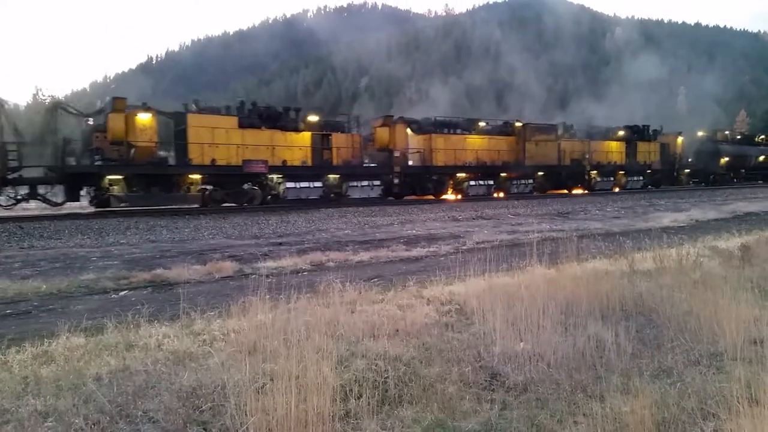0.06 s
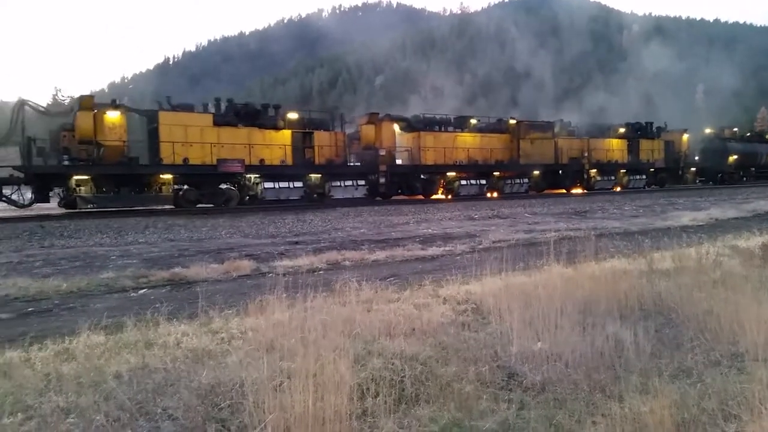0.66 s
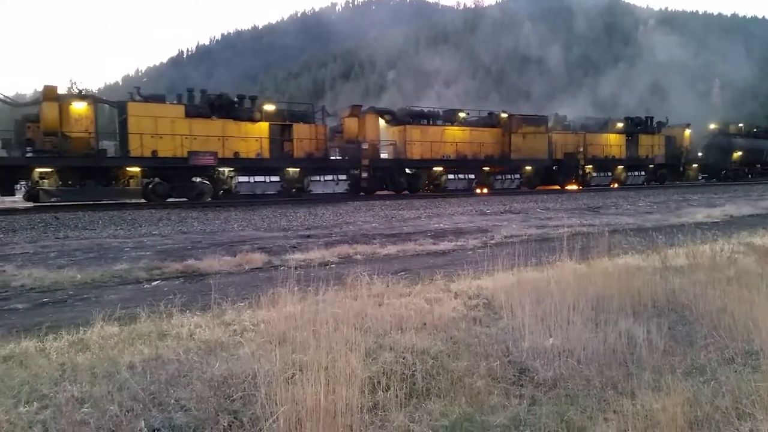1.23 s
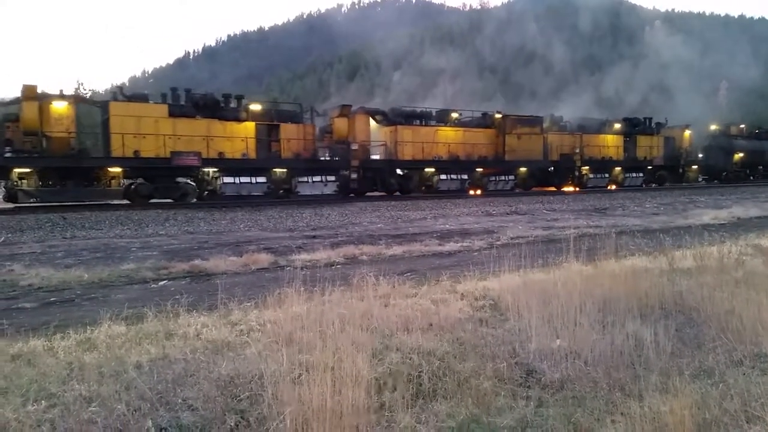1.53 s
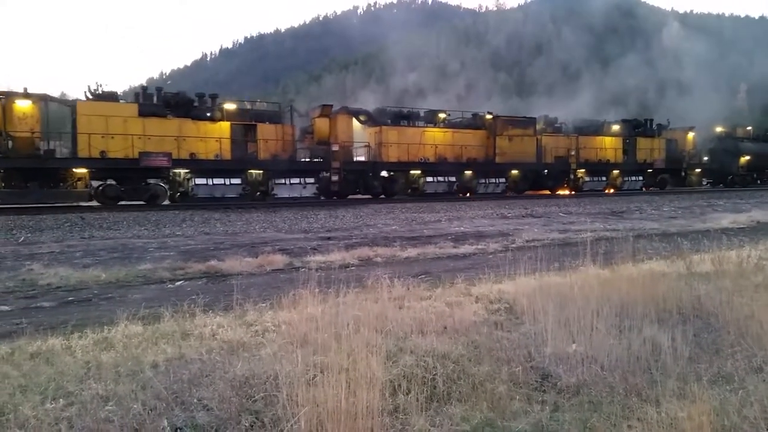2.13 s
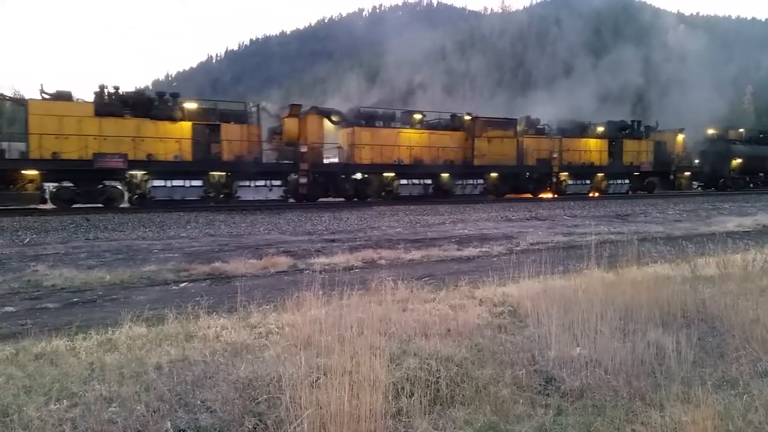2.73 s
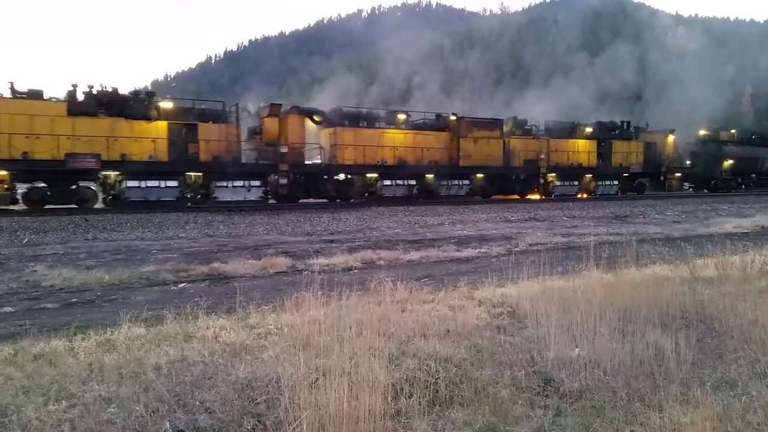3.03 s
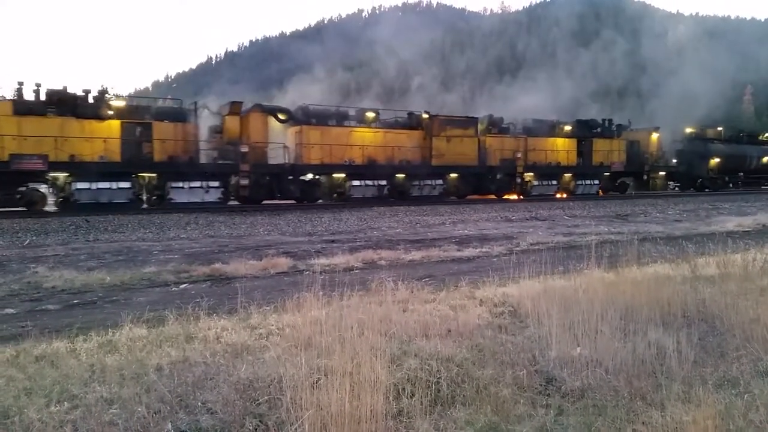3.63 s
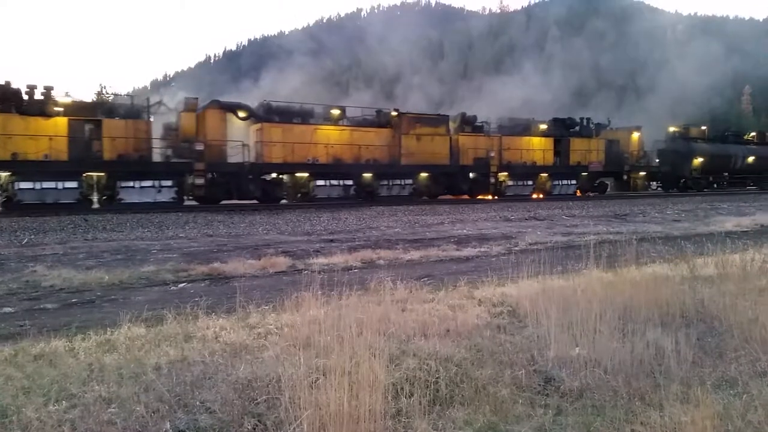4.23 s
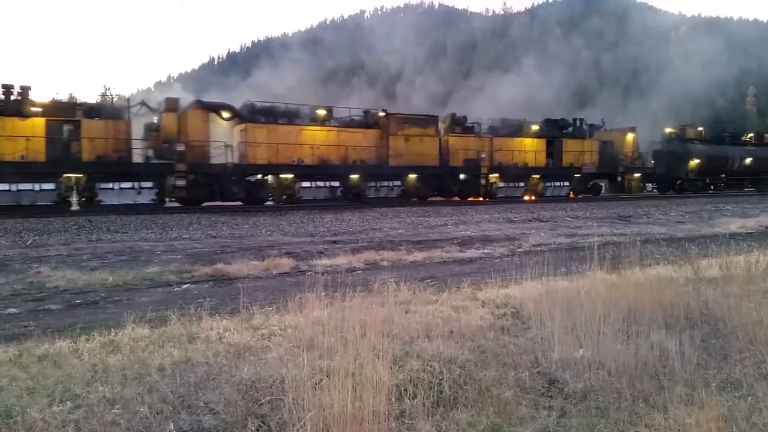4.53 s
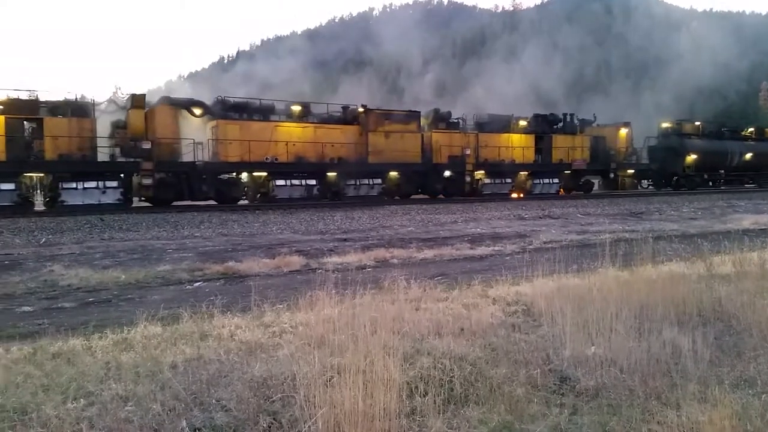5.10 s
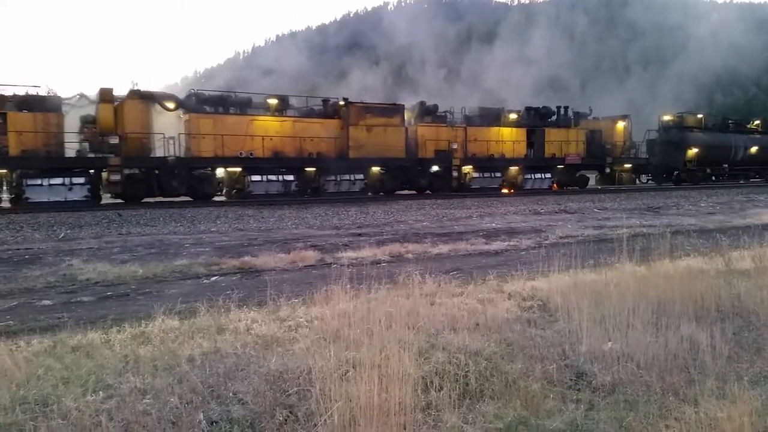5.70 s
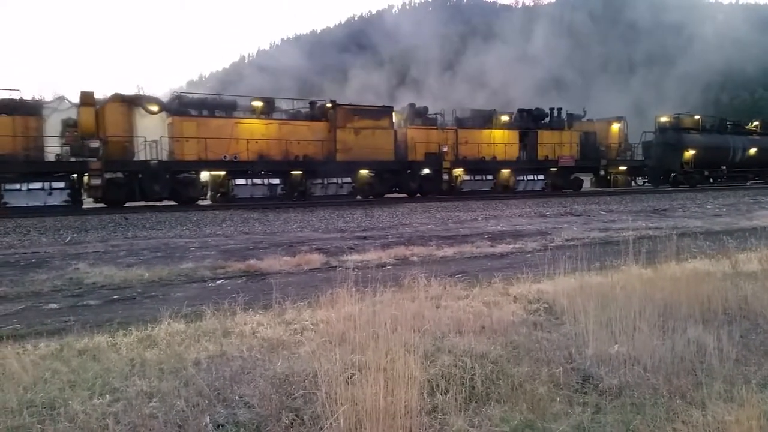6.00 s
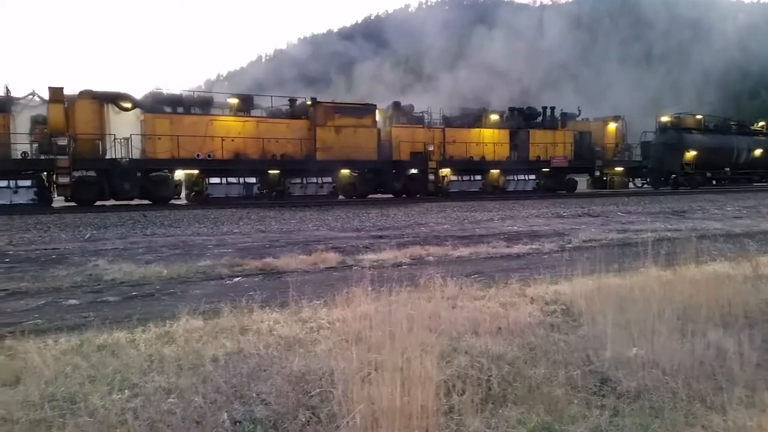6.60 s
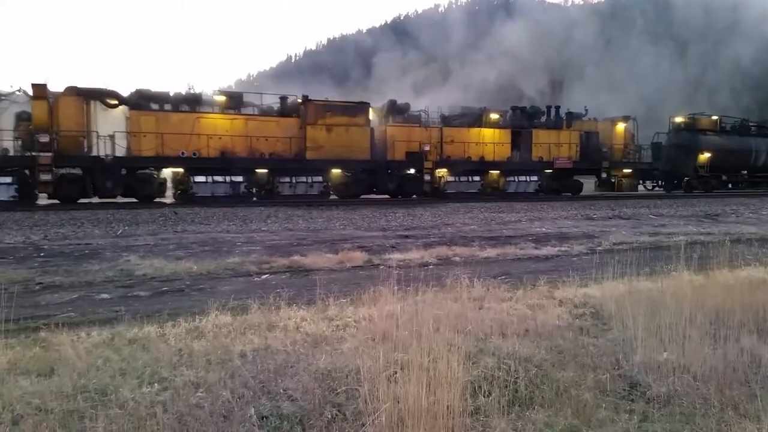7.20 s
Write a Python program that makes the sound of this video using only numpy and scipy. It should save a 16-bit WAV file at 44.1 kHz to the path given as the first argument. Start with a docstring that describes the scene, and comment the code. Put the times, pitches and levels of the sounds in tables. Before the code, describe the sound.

Low diesel rumble and machine hum run steadily under the pulsing hiss and thin squeals of a slow train grinding the rails.

```python
"""A rail grinding train creeps past across open ground.
From the start, diesel generators near 30 turns a second beat against each other over machine hum,
exhaust rumble and fan roar; spinning stones hiss and throb on the rail, turbochargers whine far above.
From 0.3 s rail and stones squeal faintly, and now and then a stone bites harder.
Two beating fans swell near 1.9 s and again from 3.3 s; the squeals crowd together around 6 s."""
import sys
import numpy as np
from scipy import signal
from scipy.fft import rfft, irfft
from scipy.io import wavfile
from scipy.ndimage import uniform_filter1d, minimum_filter1d

SR = 44100
rng = np.random.default_rng(int(sys.argv[2]) if len(sys.argv) > 2 else 0)


def master_out(mix):
    """Clip the mix to full scale and print it as 16-bit PCM to the path in sys.argv[1]."""
    frames = np.transpose(np.atleast_2d(mix))
    ceiling = np.clip(frames, -1, 1)
    pcm = np.round(ceiling * 32767).astype(np.int16)
    wavfile.write(sys.argv[1], SR, pcm)


N = 324135
TIME_S = np.arange(N) / SR
BINS_HZ = np.fft.rfftfreq(N, 1 / SR)


def gain_of(db):
    """Decibels to gain."""
    return 10 ** (np.asarray(db) / 20)


def unit_rms(x):
    """Scales to rms 1."""
    return x / np.sqrt(np.mean(abs(x) ** 2) + 1e-20)


def at_hz(table, hz):
    """Spectrum table interpolated over log frequency."""
    f_hz, value = np.transpose(table)
    return np.interp(np.log(hz + 1), np.log(f_hz + 1), value)


def follow(table):
    """Time table interpolated at every sample."""
    return np.interp(TIME_S, *np.transpose(table))


def drift(rate_hz, size=N):
    """Slow random curve, rms 1, Gaussian roll-off at rate_hz."""
    t_s = np.linspace(0, size / SR, num=8192)
    f_hz = np.fft.rfftfreq(len(t_s), t_s[1])
    lowpass = np.exp(-np.minimum((f_hz / rate_hz) ** 2 / 2, 20)) * (f_hz > 0)
    slow = irfft(rfft(rng.standard_normal(len(t_s))) * lowpass)
    return np.interp(TIME_S[:size], t_s, unit_rms(slow))


def band_envelope(width_hz, size=N):
    """Complex envelope, rms 1, that spreads a tone over a band."""
    return unit_rms(drift(width_hz / 2, size) + 1j * drift(width_hz / 2, size))


def add(mix, start_s, sound):
    """Mixes a sound in at start_s."""
    part = mix[:, max(round(start_s * SR), 0):][:, :sound.shape[1]]
    part += sound[:, :part.shape[1]]


# right microphone port, shaded from the train, re left: f/Hz, level/dB
SHADE_DB = [(90, .5), (180, 1), (330, 2.2), (500, -1.6), (800, -1.7), (1300, -4.8), (2000, -11), (3200, -8),
            (4300, -19.8), (6000, -28), (8000, -21.8), (10000, -15), (11800, 0), (13000, -2), (15000, .5)]
# phase lead of the left port: f/Hz, phase/rad
LEAD_RAD = [(60, 0.012), (170, 0.092), (400, 1.06), (750, 1.65), (1100, 3.2), (1500, 4.97), (1850, 6.1),
            (2800, 7.25), (4000, 11)]
def right_port(hz):
    """Complex gain of the shaded, lagging right port."""
    return gain_of(at_hz(SHADE_DB, hz)) * np.exp(-1j * at_hz(LEAD_RAD, hz))


# likeness of the two ports: f/Hz, coherence/0-1
COHERENCE = [(100, 0.91), (280, 0.95), (450, 0.78), (750, 0.85), (1000, 0.64), (1250, 0.29), (1700, 0.29),
             (2600, 0.21), (4000, .12), (9000, .05)]
def noise(spectrum_db):
    """Shaped, partly coherent stereo noise, rms 1 on the left."""
    left, unrelated = rfft(rng.standard_normal((2, N))) * gain_of(at_hz(spectrum_db, BINS_HZ))
    coherence = np.clip(at_hz(COHERENCE, BINS_HZ), 0, 1)
    right = (coherence * left + np.sqrt(1 - coherence ** 2) * unrelated) * right_port(BINS_HZ)
    pair = irfft(np.array([left, right]), N)
    return pair / pair[0].std()


def tone(hz, envelope):
    """Stereo tone with a complex envelope and random phase."""
    wave = envelope * np.exp(2j * np.pi * (hz * TIME_S[:len(envelope)] + rng.random()))
    return np.array([wave.real, (wave * right_port(hz)).real])


# exhaust orders 2-4, each from its leading diesel: f/Hz, start level/dB, fall/(dB/s)
EXHAUST_ORDERS = [(59.7, -24.5, .1), (89.9, -13.4, .55), (121.05, -17.2, .15)]
# the other engines: order f/Hz, offset/Hz, level re order/dB, crest t/s
ENGINE_BEATS = [(59.7, .61, .4, 4.22), (59.7, .2, -3, 2.36), (89.9, -.29, -3.5, 4.45),
                (89.9, .93, -4.2, 3.28), (89.9, -.48, -11, 4.29), (121.05, -1.22, -6.4, 3.45),
                (121.05, -1.43, -8, 3.39), (121.05, -2.1, -7, 3.79), (121.05, -6.54, -7.5, 3.546),
                (121.05, 4.31, -11.5, 3.685)]
def diesels(trim_db=0.28, wander_rad=0.28):
    """Exhaust orders swell as the engines fall into step, fade as they slide apart, and slowly recede."""
    out = np.zeros((2, N))
    for hz, db, fall_db_per_s in EXHAUST_ORDERS:
        others = sum(gain_of(beat_db) * np.exp(2j * np.pi * offset_hz * (TIME_S - crest_s))
                     for order_hz, offset_hz, beat_db, crest_s in ENGINE_BEATS if order_hz == hz)
        level = gain_of(trim_db + db - fall_db_per_s * TIME_S)
        wander = np.exp(1j * wander_rad * drift(0.45))
        out += tone(hz, level * (1 + others) * wander)
    return out


# engine, pump and blower tones: f/Hz, level/dB, unsteadiness/0-1, nearest t/s
MACHINE_TONES = [(179.4, -26.5, .45, 3.1), (180.4, -30, .45, 6.6), (240.5, -32, .5, 3.5),
                 (269.6, -26.5, .4, 2.3), (299.8, -27.5, .45, 1.5), (451.6, -40, .8, 3.5),
                 (473.8, -33, .3, 7.3), (481, -36, .5, .9), (539.4, -35.5, .35, 4.6), (720, -38, .7, 1)]
def hums(passing_s=2.2, waver_hz=1.8):
    """Each machine swells as it nears and falls away with distance; close pairs beat."""
    out = np.zeros((2, N))
    for hz, db, unsteady, nearest_s in MACHINE_TONES:
        distance = np.hypot(1, (TIME_S - nearest_s) / passing_s)
        waver = unit_rms(1 - unsteady + unsteady * band_envelope(waver_hz))
        out += tone(hz, gain_of(db) / distance * waver)
    return out


# blade tones: f/Hz, relative level/dB
FAN_TONES = [(356.2, -1), (358.9, 1.5)]
# fans drawing near: t/s, level/dB
FAN_LEVEL_DB = [(0, -41), (1.4, -37), (1.9, -31), (2.7, -37.5), (3.3, -29.5), (5.2, -30.5), (5.75, -32.5),
                (6.1, -31.5), (7.35, -32)]
def fans(wander_rad=0.5):
    """Two cooling fans at nearly the same speed beat."""
    return sum(tone(hz, gain_of(follow(FAN_LEVEL_DB) + db) * np.exp(1j * wander_rad * drift(0.97)))
               for hz, db in FAN_TONES)


# exhaust noise: f/Hz, relative level/dB
RUMBLE_SPECTRUM_DB = [(12, -31), (25, -20), (45, -12.5), (70, -5.3), (105, -.5), (145, -3), (205, -11),
                      (280, -10.2), (335, -13.5), (420, -22), (800, -45), (2000, -100)]
def rumble(level_db=-18.0, heave_db=0.1, heave_hz=2.1):
    """Exhaust rumble, barely heaving."""
    return noise(RUMBLE_SPECTRUM_DB) * gain_of(level_db + heave_db * drift(heave_hz))


# blower and grinding head noise: f/Hz, relative level/dB
ROAR_SPECTRUM_DB = [(50, -60), (220, -46), (400, -5.5), (520, -1.5), (700, -1), (800, -3), (950, -5),
                    (1300, -5.5), (1550, -10.5), (1800, -8.5), (2100, -13.5), (2500, -15.5), (3200, -22),
                    (7000, -43)]
# cars going by: t/s, level/dB
ROAR_LEVEL_DB = [(0, -25.0), (0.45, -23), (1.3, -24), (1.7, -23), (2.0, -24.8), (2.55, -23), (3.8, -24),
                 (4.35, -25), (4.85, -22.5), (5.25, -24), (5.75, -22.5), (6.7, -24.5), (7.35, -22.5)]
def roar(load_db, trim_db=1.6, load_share=0.53):
    """Blowers and grinding heads roar, partly following the stone load."""
    return noise(ROAR_SPECTRUM_DB) * gain_of(follow(ROAR_LEVEL_DB) + trim_db + load_share * load_db)


# three presses per cycle: t/s in cycle, sigma/s, rise/dB
THROB_PULSES = [(.037, .016, 1.6), (.07, .015, 1.0), (.157, .02, 1.0)]
def throb_db(cycle_s=0.1871):
    """Periodic pressure of the stones on the rail, zero mean."""
    load_db = np.zeros(N)
    for at_s, sigma_s, db in THROB_PULSES:
        offset_s = (TIME_S - at_s + cycle_s / 2) % cycle_s - cycle_s / 2
        load_db += db * np.exp(-(offset_s / sigma_s) ** 2 / 2)
    return load_db - load_db.mean()


# stones on the rail: f/Hz, relative level/dB
HISS_SPECTRUM_DB = [(800, -60), (2500, -7.5), (3600, -6), (4200, 2.5), (5200, 1.8), (6300, -1), (7200, -6),
                    (7900, -8.5), (9000, -6.5), (10200, -8.5), (11200, -15), (13300, -20), (14800, -24),
                    (16000, -31)]
# grinding heads going by: t/s, level/dB
HISS_LEVEL_DB = [(0, -36.5), (0.55, -33.5), (2.1, -36), (2.4, -34.4), (2.8, -35.5), (3.7, -35),
                 (4.25, -36.5), (4.85, -35), (5.3, -36), (5.85, -35.5), (6.75, -37), (7.35, -35)]
def grinding(load_db, hiss_trim_db=2.5, spin_hz=62.2, flutter_db=0.5, flicker_db=0.86, sputter_db=3.5):
    """The stones' hiss flutters once a turn and flickers as grit breaks off; squeals sputter deeper."""
    spin = np.cos(2 * np.pi * (spin_hz * TIME_S + 0.27 * drift(1)))
    contact_db = load_db + flutter_db * spin + flicker_db * drift(25)
    hiss = noise(HISS_SPECTRUM_DB) * gain_of(follow(HISS_LEVEL_DB) + hiss_trim_db)
    return (hiss + grit_rings() + squeals() * gain_of(sputter_db * spin)) * gain_of(contact_db)


# turbocharger and drive tones: f/Hz, width/Hz, relative level/dB
WHINE_BANDS = [(11995, 70, 1.5), (13575, 50, -5), (14400, 90, 5)]
# all whines: t/s, level/dB
WHINE_LEVEL_DB = [(0, -63.5), (0.7, -55.1), (2.0, -60.4), (3.0, -55.5), (3.35, -63.4), (4.85, -57.0),
                  (5.25, -62.2), (5.9, -56.6), (6.3, -62.4), (7.35, -61.3)]
def whines(trim_db=-1.0, flutter_db=2.6):
    """Thin whines of turbochargers and drives flutter in the moving air."""
    level_db = follow(WHINE_LEVEL_DB) + trim_db
    return sum(tone(hz, band_envelope(width_hz) * gain_of(level_db + db + flutter_db * drift(4)))
               for hz, width_hz, db in WHINE_BANDS)


# modes of rail and stones: f/Hz
MODES_HZ = [4060, 4070, 4700, 5000, 4750, 5350, 5740, 6000, 5860, 7000, 8100, 9020, 9500, 10150]
def grit_rings(count=260, length_s=0.17, base_db=-47, spread_db=1.6, detune_span=0.0094):
    """Grit catches at random and briefly rings one mode."""
    out = np.zeros((2, N))
    swell = signal.windows.hann(round(length_s * SR))
    for when, which, detune, softness in rng.random((count, 4)):
        hz = MODES_HZ[int(which * len(MODES_HZ))] * (1 + detune_span * (detune - 0.5))
        db = base_db + at_hz(HISS_SPECTRUM_DB, hz) - spread_db * np.log(softness + 0.05)
        add(out, when * TIME_S[-1], tone(hz, gain_of(db) * swell))
    return out


# rail and stones singing: start t/s, end t/s, f/Hz, width/Hz, level/dB
SQUEAL_BANDS = [(.3, .9, 4800, 122, -38), (.65, .9, 8290, 60, -45), (1.4, 1.66, 6350, 60, -44),
                (2.24, 2.47, 6330, 52, -35), (2.29, 4.2, 8270, 80, -46), (2.4, 2.75, 9720, 50, -46),
                (2.73, 2.92, 4320, 60, -38), (2.95, 3.2, 4190, 80, -36), (3.48, 3.67, 4270, 60, -38),
                (3.6, 5.2, 6100, 120, -43), (5.4, 6.7, 6700, 450, -39), (5.6, 7.3, 6320, 80, -44),
                (5.7, 6.35, 6050, 160, -35), (5.93, 6.15, 6035, 60, -35), (6.46, 6.75, 6100, 160, -36),
                (5.6, 6.1, 5740, 150, -41), (6.5, 7.5, 5750, 130, -38)]
def squeals(trim_db=-1.5):
    """Narrow rings swell and fade as each stone passes."""
    out = np.zeros((2, N))
    for start_s, end_s, hz, width_hz, db in SQUEAL_BANDS:
        swell = signal.windows.cosine(round((end_s - start_s) * SR) + 2)
        envelope = gain_of(db + trim_db) * swell * band_envelope(width_hz, len(swell))
        add(out, start_s, tone(hz, envelope))
    return out


# brief changes of stone load: t/s, level/dB
STONE_BITES = [(.408, -0.5), (1.289, 2), (1.457, 0.5), (2.373, 1.5), (2.836, -1.5), (3.029, 2),
               (3.158, 1.5), (3.595, 0.5), (3.78, 3.5), (4.073, 2), (4.844, 2), (5.66, 2.5), (5.942, 2.5),
               (6.057, 0.5), (6.406, 2), (6.589, 1), (6.978, 2)]
def bites_db(sigma_s=0.015):
    """A stone bites harder into the rail, or eases where the level is negative."""
    return sum(db * np.exp(-((TIME_S - at_s) / sigma_s) ** 2 / 2) for at_s, db in STONE_BITES)


def scene():
    """The whole train; one stone load drives roar and grinding."""
    load_db = throb_db() + bites_db()
    return diesels() + hums() + fans() + rumble() + roar(load_db) + grinding(load_db) + whines()


def record(dry, ceiling=0.93, window_samples=900, cutoff_hz=15780):
    """Smooth peak limiter, then low-pass."""
    needed_gain = np.minimum(ceiling / (abs(dry).max(0) + 1e-9), 1)
    held_gain = minimum_filter1d(needed_gain, window_samples)
    limited = dry * uniform_filter1d(held_gain, window_samples)
    lowpass = signal.firwin(1023, cutoff_hz, window=("kaiser", 9), fs=SR)
    return signal.oaconvolve(limited, lowpass[None], "same")


dry = scene()
out = record(dry)
master_out(out)
```